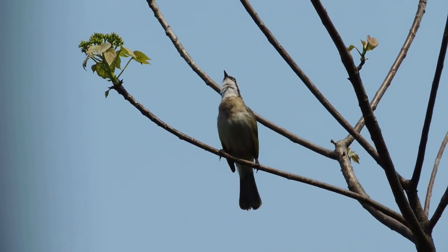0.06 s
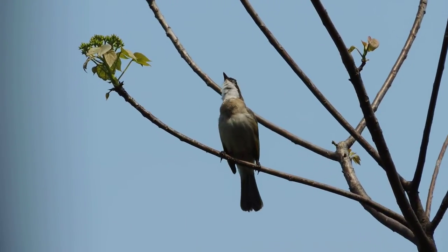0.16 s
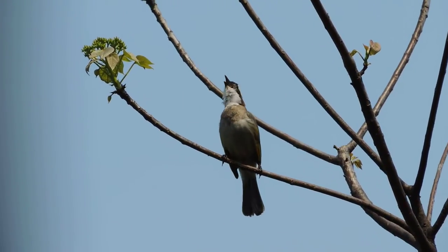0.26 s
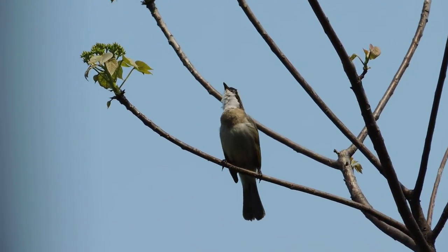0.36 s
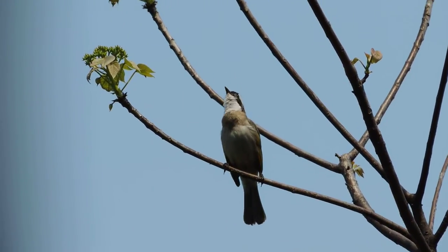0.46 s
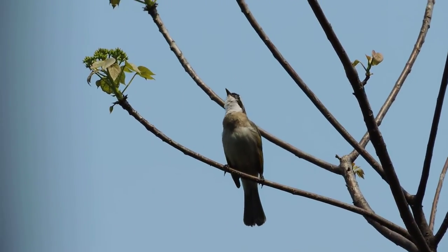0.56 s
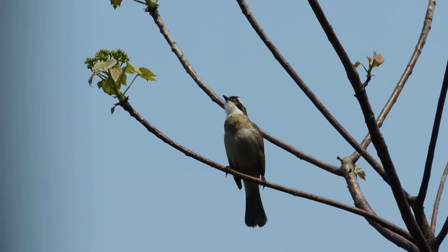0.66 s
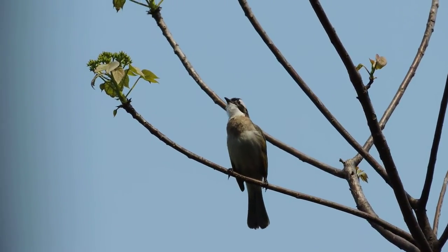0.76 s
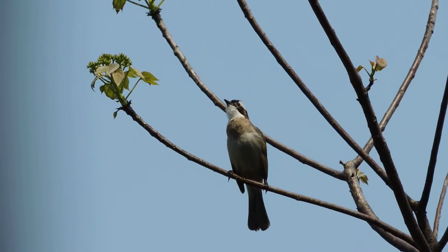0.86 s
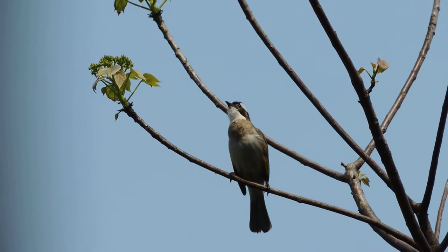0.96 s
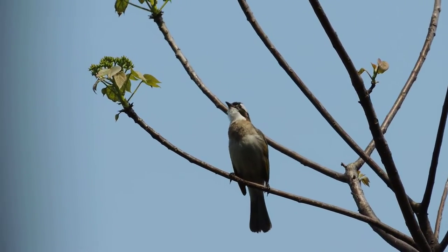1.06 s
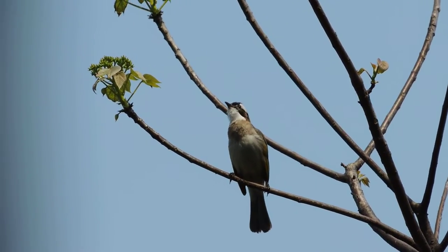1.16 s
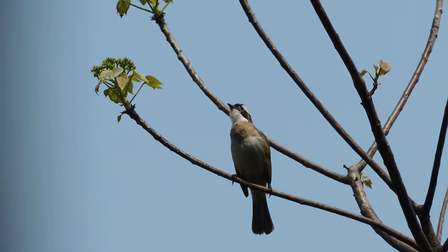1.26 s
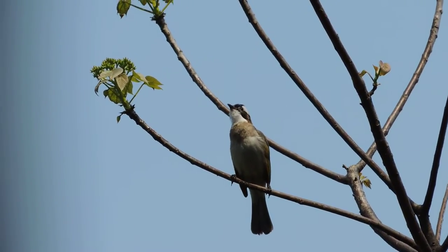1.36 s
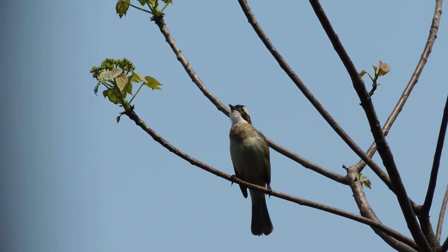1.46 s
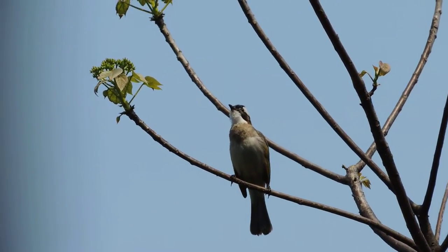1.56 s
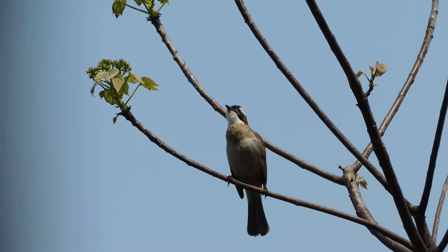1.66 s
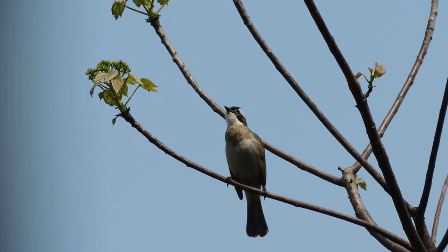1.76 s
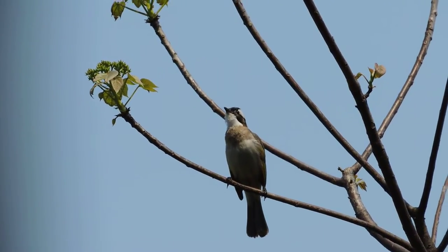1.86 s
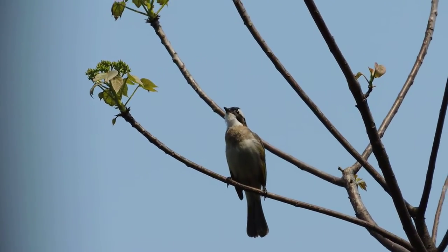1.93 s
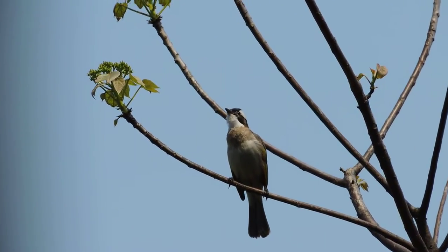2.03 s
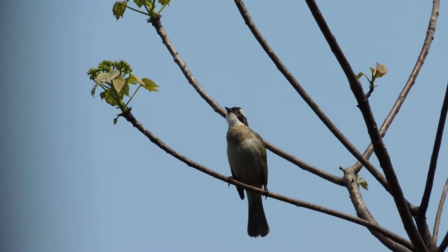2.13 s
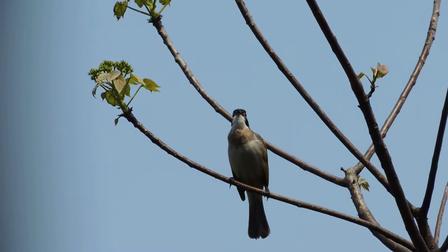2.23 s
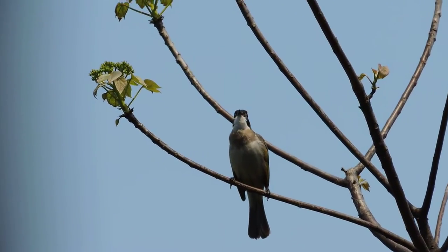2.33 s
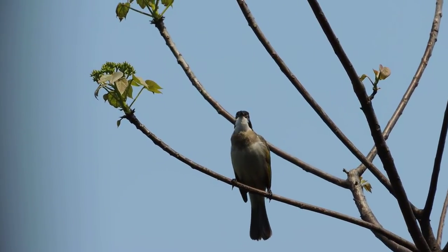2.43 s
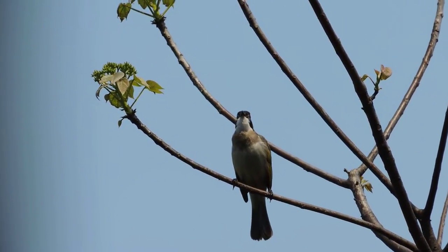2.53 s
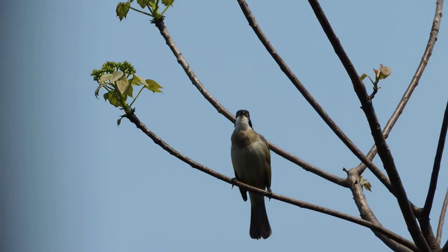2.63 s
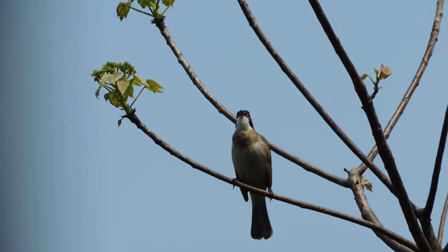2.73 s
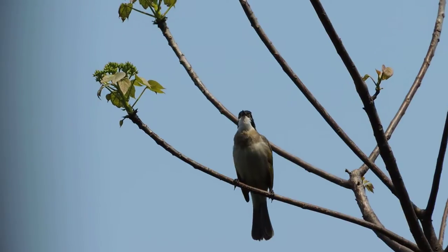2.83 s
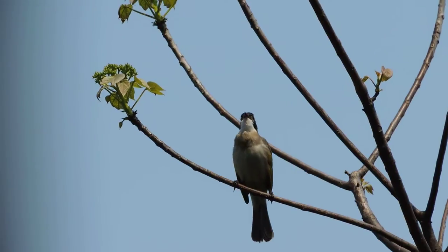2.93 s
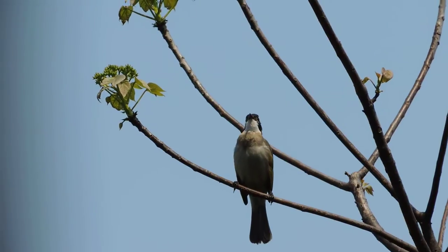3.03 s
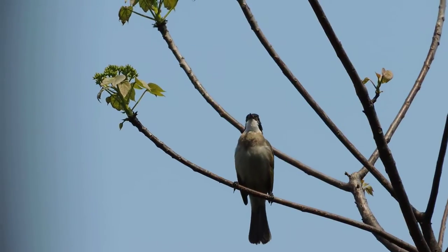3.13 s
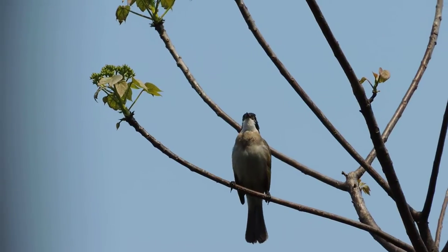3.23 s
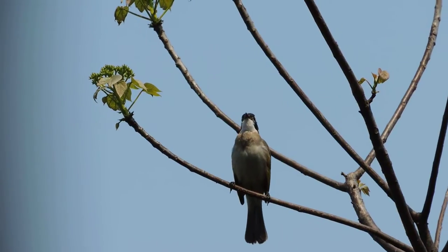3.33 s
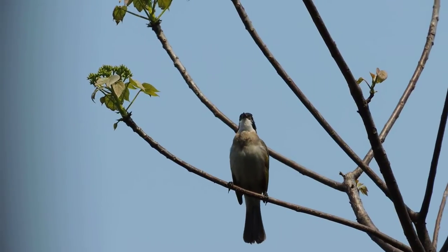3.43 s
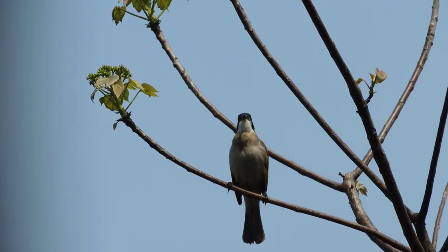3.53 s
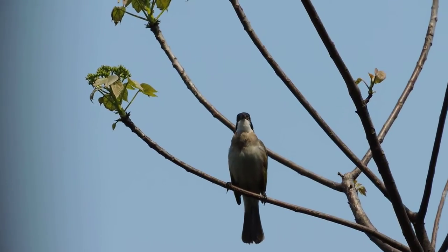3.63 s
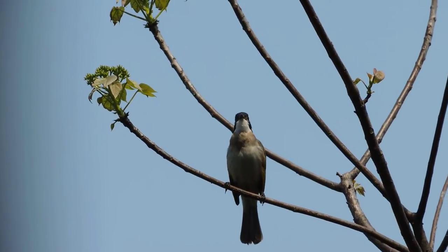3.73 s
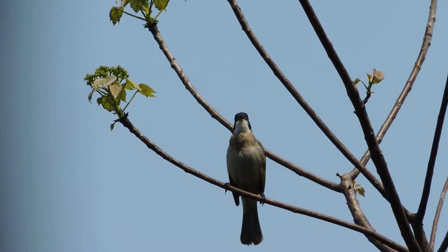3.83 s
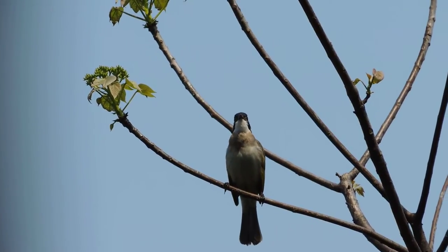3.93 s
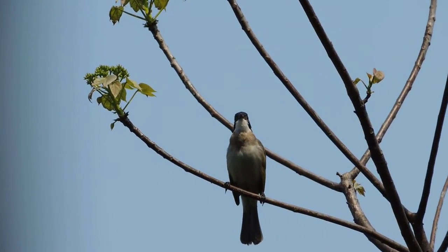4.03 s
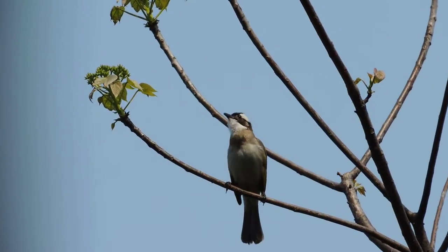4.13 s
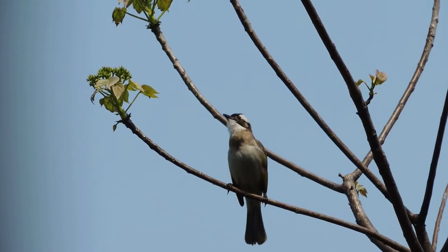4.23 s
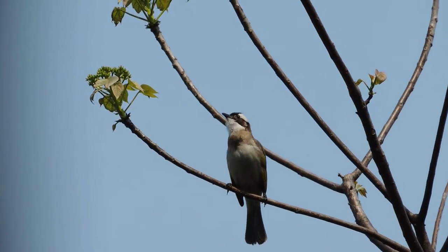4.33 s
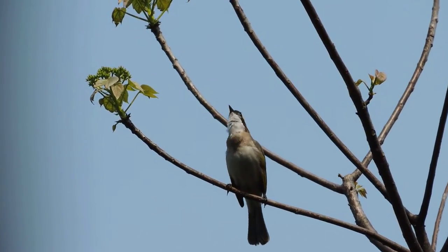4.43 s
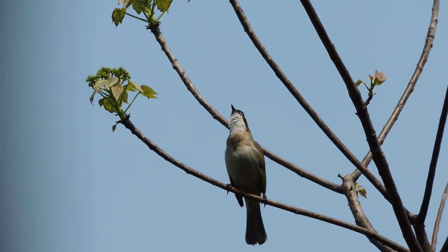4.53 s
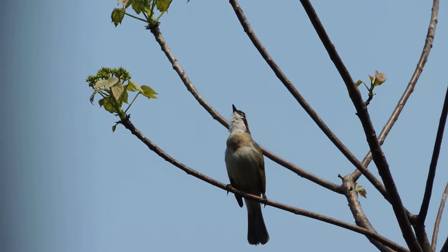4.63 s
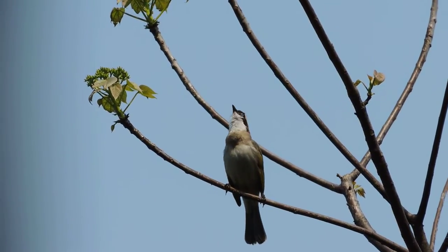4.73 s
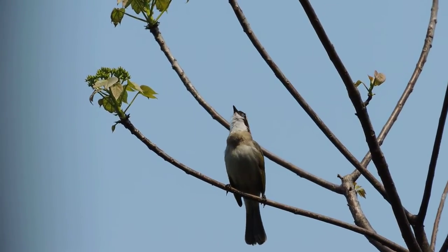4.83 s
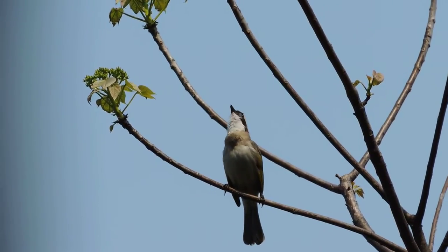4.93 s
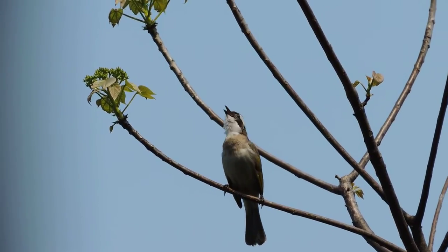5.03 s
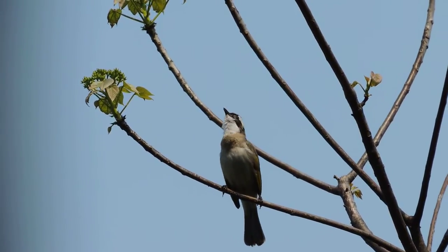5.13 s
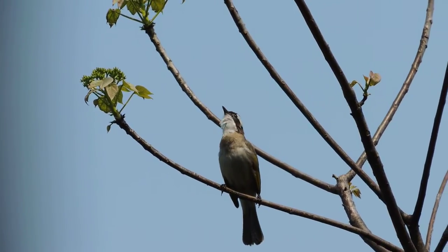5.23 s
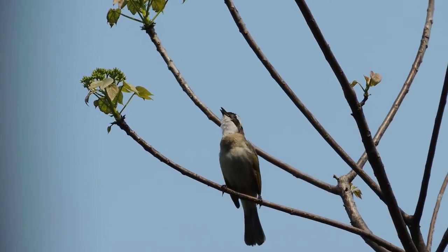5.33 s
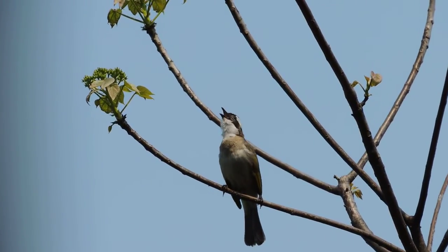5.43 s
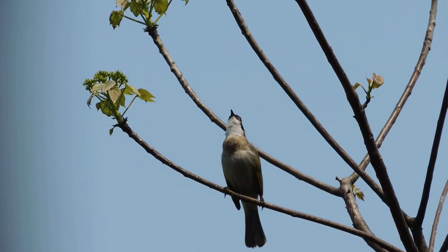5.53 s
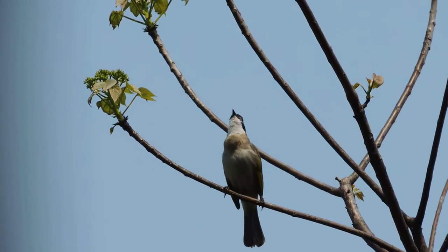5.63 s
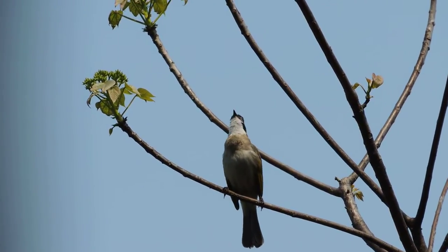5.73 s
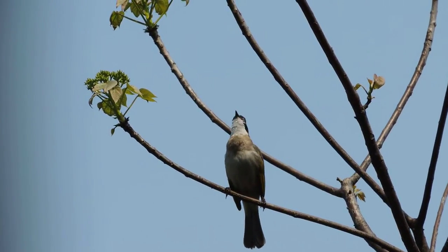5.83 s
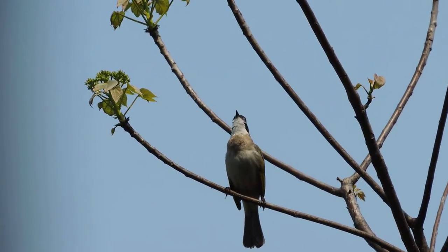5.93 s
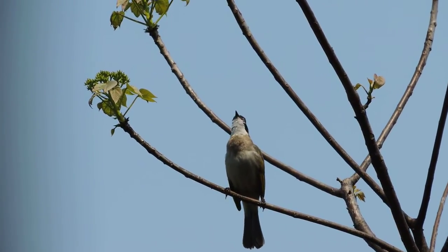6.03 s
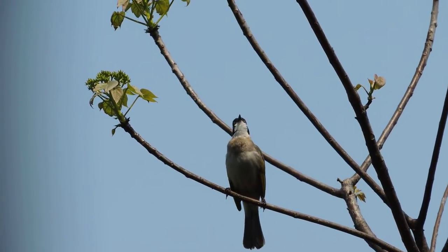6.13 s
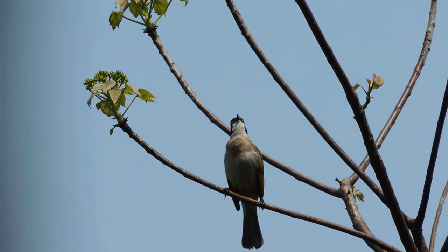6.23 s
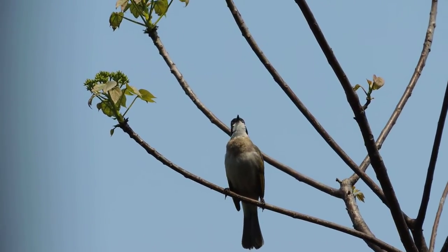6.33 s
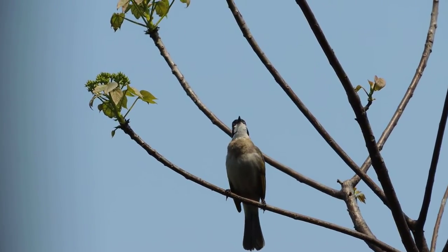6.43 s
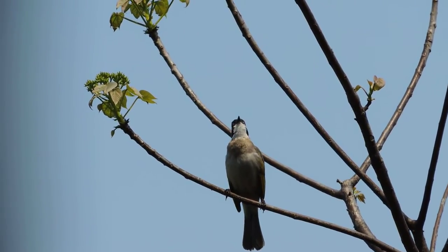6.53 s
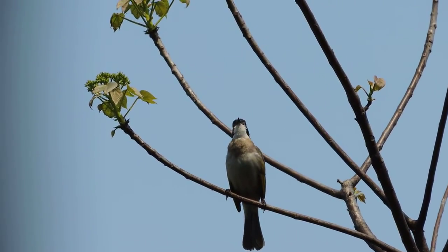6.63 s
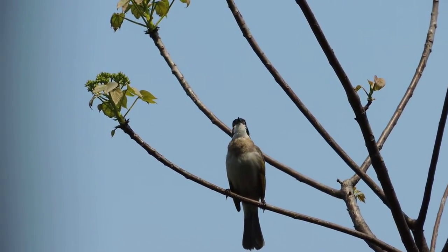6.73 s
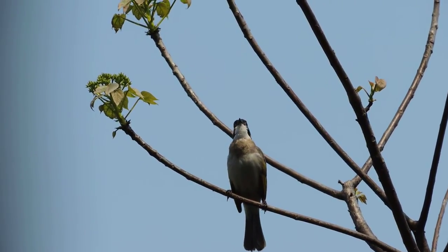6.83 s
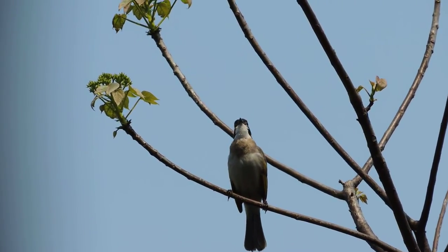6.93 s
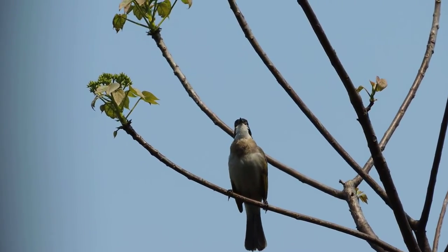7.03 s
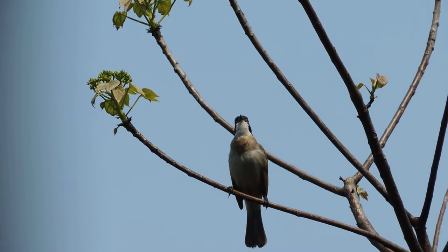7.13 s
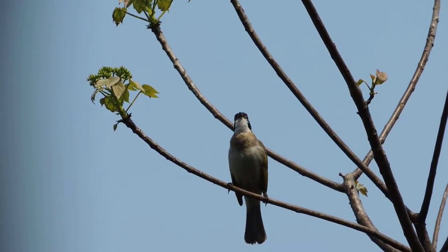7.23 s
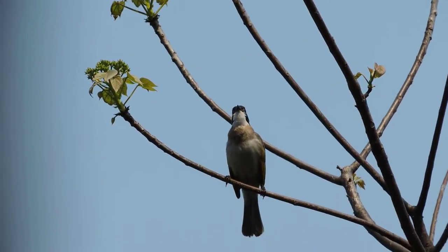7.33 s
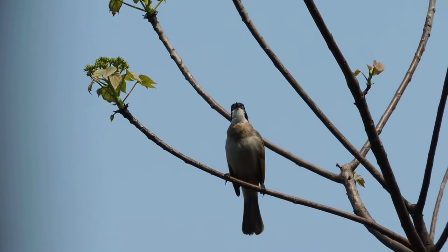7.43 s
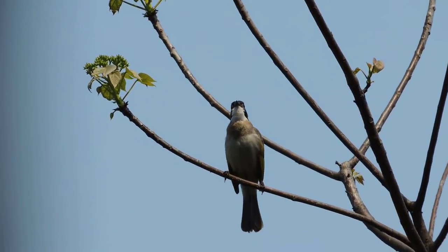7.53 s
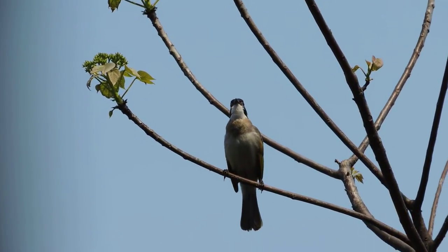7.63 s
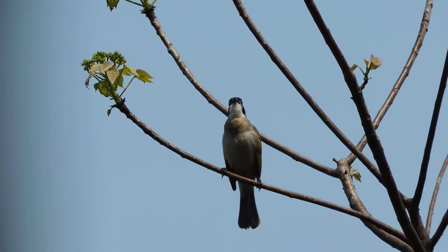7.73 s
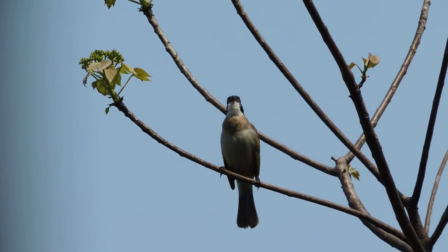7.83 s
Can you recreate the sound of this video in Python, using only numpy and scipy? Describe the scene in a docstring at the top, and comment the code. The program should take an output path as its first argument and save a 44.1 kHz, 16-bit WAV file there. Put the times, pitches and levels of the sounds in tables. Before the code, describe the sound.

A bulbul on a bare branch, close and clear, finishes one phrase: a loud rippling chirp, a soft low lead-in, another chirp. Several seconds of quiet follow, with low machine hum, distant traffic rumble, faint hiss and tiny far pips. It then sings a second phrase of quick notes and two chirps, echoing lightly off walls and trees, before the background returns.

```python
"""Bulbul on a branch, town behind

A bulbul close to the microphones sings two phrases, the first already under way: gliding partials from its
syrinx make soft low notes that lead into loud chirps flipping between two pitches. Nearby walls and trees
answer as delays and scatter; a far building sends back a faint, dull echo. Behind, wavering tones make a machine's
hum and whines, shaped noise the rumble of a town and the microphones' hiss; faint far calls and a thud pass.
"""
import sys
import numpy as np
from scipy import signal
from scipy.fft import rfft, irfft, next_fast_len
from scipy.io import wavfile
from scipy.ndimage import map_coordinates

SR = 44100
rng = np.random.default_rng(int(sys.argv[2]) if len(sys.argv) > 2 else 0)


def to_wav(s):
    """Save 16-bit WAV."""
    ch = np.atleast_2d(s).T  # columns
    pcm = np.round(np.clip(ch, -1, 1) * 32767)  # PCM
    wavfile.write(sys.argv[1], SR, pcm.astype(np.int16))


N = 347067


def amp(db):
    """Decibels to gain."""
    return 10 ** (np.asarray(db) / 20)


def unit(x):
    """Scale to rms 1."""
    return x / np.sqrt(np.mean(x ** 2) + 1e-20)


def along(points, hz):
    """Read a table of (f/Hz, value) points at hz, on a log axis."""
    f, v = np.transpose(points)
    return np.interp(np.log(hz + 1), np.log(f + 1), v)


def wobble(rate, size=N):
    """A smooth random curve with rate knots a second."""
    knots = rng.standard_normal(int(size * rate / SR) + 4)
    return map_coordinates(knots, [np.arange(size) * rate / SR])


def filtered(x, response):
    """Shape the spectrum of x by a response of frequency."""
    m = next_fast_len(N + SR // 2)
    spectrum = rfft(x, m) * response(np.fft.rfftfreq(m, 1 / SR))
    return irfft(spectrum, m)[..., :N]


def panned(lean_db):
    """Left and right gains for a left-minus-right level difference."""
    return amp(np.array([[1], [-1]]) * lean_db / 2)


def delayed(x, seconds):
    """The extra travel time of a longer path, as a phase slope."""
    return filtered(x, lambda hz: np.exp(-2j * np.pi * hz * seconds))


def add(track, s, sound):
    """Mix a sound into a track at s seconds; it may already be under way at time 0."""
    start = round(s * SR)
    sound = sound[max(-start, 0):]
    part = track[max(start, 0):][:len(sound)]
    part += sound[:len(part)]


def syllable(length, start_hz, end_hz, overtones_db, jitter, settle=2.14, edge=0.0019, arch_db=5,
             shimmer_db=1.56, rasp_db=-9, surge=0.4):
    """One glide of the syrinx: quick at first, then settling on its end pitch."""
    # what throat and beak let through of the overtones: f/Hz, level/dB
    throat = [(3000, -4), (4800, -22.5), (5700, -17), (7300, -27), (8500, -34), (9500, -1.5), (11400, -5),
              (12300, -18), (14000, -24)]
    t = np.arange(int((length + edge) * SR)) / SR
    u = t / t[-1]
    glide = (1 - np.exp(-settle * u)) / (1 - np.exp(-settle))
    steady_pitch = start_hz + (end_hz - start_hz) * glide
    pitch = steady_pitch * (1 + jitter * wobble(872, size=len(t)))
    phase = 2 * np.pi * np.cumsum(pitch) / SR

    # air pressure swells early in the syllable and sags towards its end
    gate = np.sin(np.clip(np.minimum(t, t[-1] - t) / edge, 0, 1) * np.pi / 2) ** 2
    arch = arch_db * (np.sin(np.pi * u ** 0.69) - 2 / np.pi)
    pressure = gate * amp(arch + shimmer_db * wobble(263, size=len(t)))

    # the chirps' fourth partial falls near the throat's high resonance; uneven closure frays the overtones
    k = np.arange(2, 8)[:, None]
    gains = amp(overtones_db + along(throat, k * pitch)) * (k * pitch < SR / 2)
    fray = amp(rasp_db) * wobble(4010, size=len(t))
    overtones = np.sum(gains * (np.sin(k * phase) + fray * np.cos(k * phase)), axis=0)
    # harder blowing is brighter
    return np.sqrt(2) * pressure * (np.sin(phase) + pressure ** surge * overtones)


def chirp(s, hz, db, stretch, bright_db):
    """A flick, then flips between a high and a low voice, at one pitch, strength, pace and brightness."""
    # syllables when sung at shape_hz: offset t/s, length t/s, start f/Hz, end f/Hz,
    # level/dB and overtones level/dB (both shifted for each chirp)
    shape = [ (0, .0052, 3330, 2900, 2.5, -20), (.0065, 0.011, 2780, 2860, -3, -10.5),
             (.0195, .0115, 2480, 2400, -5, -6), (.0335, 0.02, 2976, 2690, 0.5, -12),
             (0.062, 0.015, 2460, 2345, -3, -10.5), (.0765, .02, 2990, 2604, -1, -14.5), ]
    shape_hz = 2800
    scale = hz / shape_hz
    return [(s + stretch * offset, stretch * length, scale * start_hz, scale * end_hz,
             db + level_db, overtones_db + bright_db)
            for offset, length, start_hz, end_hz, level_db, overtones_db in shape]


def bulbul(chirp_jitter=0.019, murmur_jitter=0.024):
    """Opening notes, lead-ins and chirps; slack membranes hold the low notes less steadily."""
    # each chirp: t/s, pitch f/Hz, level/dB, time stretch (ratio), brightness of the overtones level/dB
    chirps = [(-.0085, 2804, -26, 0.97, 1), (0.4184, 2782, -24.5, 1.01, 0.5), (5.1257, 2806, -26.5, .99, 3),
              (5.5531, 2884, -24.5, 1.01, -1.5)]
    # soft lead-ins: t/s, low f/Hz, high f/Hz, length of the high note t/s, level/dB
    lead_ins = [(0.249, 1483, 1936, 0.03, -44), (5.386, 1457, 2030, 0.057, -46)]
    # single notes that open the second phrase:
    # t/s, length t/s, start f/Hz, end f/Hz, level/dB, overtones level/dB
    opening = [ (4.581, 0.0093, 2650, 2220, -34, -19), (4.686, 0.034, 1640, 1550, -44, -15),
               (4.722, 0.0175, 3080, 2633, -24, -15), (4.736, .008, 2590, 2880, -35, -6),
               (4.743, .011, 2470, 2280, -30.5, -6.5), (4.756, 0.0266, 2510, 2367, -28.5, -10.5), ]
    figures = [opening] + [lead_in(*row) for row in lead_ins] + [chirp(*row) for row in chirps]
    song = np.zeros(N)
    for figure in figures:
        for s, length, start_hz, end_hz, db, overtones_db in figure:
            jitter = np.interp(end_hz, [1500, 2400], [murmur_jitter, chirp_jitter])
            add(song, s, amp(db) * syllable(length, start_hz, end_hz, overtones_db, jitter))
    return song


def perch(song):
    """The direct path from the branch: it reaches the right microphone first, its treble stronger there."""
    # f/Hz, left minus right level/dB
    perch_lean = [(2400, 2.5), (3100, -3.5), (10000, -6)]
    pair = np.array([delayed(song, .000015), song])
    return amp(-3.0) * filtered(pair, lambda hz: panned(along(perch_lean, hz)))


def town():
    """Distant traffic: alike in both ears in the bass, diffuse higher up; the low part swells on its own."""
    # the rumble's relative spectrum: f/Hz, level/dB per Hz
    rumble = [(22, -6.5), (40, -10), (56, 0), (72, -6), (135, -1.5), (170, -6), (245, -1), (330, -10),
              (600, -17.5), (900, -12.5), (1120, -20), (1700, -23), (3000, -27), (6000, -40)]
    # f/Hz, left-right likeness (0 to 1)
    likeness = [(60, 0.99), (130, 0.97), (290, 0.98), (630, 0.74), (1390, 0.58), (3000, 0)]
    # f/Hz, left minus right level/dB
    town_lean = [(60, 1.5), (200, 0), (380, 4.5), (690, -1), (1270, 1), (2400, 1.5)]
    # swell of the low part, used about its mean: t/s, level/dB
    traffic = [(0, -43.5), (1.25, -43.5), (1.5, -46.5), (4.5, -45.5), (6.8, -46.5), (7.87, -45)]

    def mid_and_side(hz):
        colour = amp(along(rumble, hz)) * hz ** 2 / (hz ** 2 + 15 ** 2)
        turn = np.arccos(np.clip(along(likeness, hz), -1, 1)) / 2
        return colour * [np.cos(turn), np.sin(turn)]

    mid, side = filtered(rng.standard_normal((2, N)), mid_and_side)
    pair = np.array([mid + side, mid - side])
    air = unit(filtered(pair, lambda hz: panned(along(town_lean, hz))))
    low = filtered(air, lambda hz: 1 / (1 + (hz / 450) ** 4))
    s, db = np.transpose(traffic)
    swell = amp(np.interp(np.arange(N) / SR, s, db - np.mean(db)))
    upper = (air - low) * amp(0.75 * wobble(3.035))
    return amp(-41.5) * (low * swell + upper)


def machine(flutter_db=2.5):
    """A motor hum with thin, wavering whines, reaching the right microphone first."""
    # tones: f/Hz, level/dB, wander f/Hz, left minus right level/dB
    tones = [(117.7, -42.5, 0.065, 2), (870, -65.5, 6.5, -1), (1852, -65, 9.83, -6), (1886, -63.5, 22.1, 2)]
    out = np.zeros((2, N))
    for hz, db, wander_hz, lean_db in tones:
        phase = 2 * np.pi * np.cumsum(hz + wander_hz * wobble(45)) / SR
        # moving air disturbs short waves most
        fading = amp(flutter_db * np.sqrt(hz / 2000) * (wobble(6) + wobble(35)))
        out += amp(db) * panned(lean_db) * unit(fading * np.sin(phase))
    return np.array([delayed(out[0], .00009), out[1]])


def hiss():
    """The microphones' own steady noise, independent left and right."""
    # relative spectrum: f/Hz, level/dB
    hiss_colour = [(500, -11), (2500, 0.5), (5000, 0.5), (8000, -1.5), (14000, -4.5)]
    noise = rng.standard_normal((2, N))
    return amp(-54.0) * unit(filtered(noise, lambda hz: amp(along(hiss_colour, hz))))


def thrown_back(song):
    """Leaves and walls colour what they throw back, leaving it weaker above the low notes."""
    # f/Hz, level/dB
    reflected = [(1600, 7.5), (2350, -0.5), (2750, 0), (3400, -2.5), (10000, 0.5)]
    return filtered(song, lambda hz: amp(along(reflected, hz)))


def yard(x, build=0.0022):
    """Scatter from trees and walls builds up over build seconds, then dies soonest in the high treble."""
    # f/Hz, time to fall 60 dB t/s
    decay = [(1500, 0.41), (2800, 0.44), (6000, 0.46), (11000, 0.15)]
    hz, t, z = signal.stft(rng.standard_normal((2, SR)), SR, nperseg=256)
    fade = amp(-60 * t / along(decay, hz)[:, None]) * (1 - np.exp(-t / build))
    tail = signal.istft(z * fade, SR, nperseg=256)[1]
    return signal.fftconvolve(x[None], tail / np.linalg.norm(tail[0]), axes=1)[:, :N]


def close_walls(thrown):
    """Single reflections from walls close by, each a later and weaker copy."""
    # delay t/s, left level/dB, right level/dB
    walls = [(0.01, -17, -14.5), (0.0188, -29, -13.5), (.031, -31, -31)]
    return sum(amp([[left_db], [right_db]]) * delayed(thrown, delay) for delay, left_db, right_db in walls)


def lead_in(s, low_hz, high_hz, high_length, db, grace_s=.019, grace_rise=.14,
            low_overtones_db=-21, high_overtones_db=-11):
    """Three joined syllables: a rising grace note, a level low note, and a scoop up to the high note."""
    step_s, step_up_db = .052, 2  # when the high note comes, and how much louder
    scoop = 0.0445  # share of its pitch that the high note rises by
    return [
        (s, grace_s, low_hz, low_hz * (1 + grace_rise), db - 2.5, low_overtones_db),
        (s + grace_s, step_s - grace_s, low_hz, low_hz, db, low_overtones_db),
        (s + step_s, high_length, high_hz * (1 - scoop), high_hz, db + step_up_db, high_overtones_db),
    ]


def far_echo(x, delay=.39, t60=1.6, dull_hz=3000):
    """A smeared, dull answer from a distant building: decaying noise, delayed and stripped of treble."""
    t = np.arange(SR) / SR
    tail = rng.standard_normal((2, SR)) * amp(-60 * t / t60)
    echo = signal.fftconvolve(x[None], tail / np.linalg.norm(tail[0]), axes=1)[:, :N]
    return filtered(delayed(echo, delay), lambda hz: 1 / (1 + (hz / dull_hz) ** 8))


def far_calls():
    """Pips and another bird's chirp from far off, nearly pure glides half lost in the scatter."""
    # faint pips, all alike: t/s, level/dB
    pips = [(1.216, -58.5), (1.717, -59), (2.47, -59), (3.755, -59)]
    # another bird: t/s, length t/s, start f/Hz, end f/Hz, level/dB
    far_chirps = [(7.01, 0.03, 4750, 3650, -62.5)]
    pip_s, pip_start_hz, pip_end_hz = 0.031, 1390, 1327
    notes = [(s, pip_s, pip_start_hz, pip_end_hz, db) for s, db in pips] + list(far_chirps)
    calls = np.zeros(N)
    for s, length, start_hz, end_hz, db in notes:
        add(calls, s, amp(db) * syllable(length, start_hz, end_hz, overtones_db=-40, jitter=0.022))
    return calls + yard(calls)


def thuds(width=0.03):
    """A soft low boom far off: a sine that swells and fades within a few cycles."""
    # t/s of the peak, f/Hz, level/dB
    booms = [(2.678, 108, -39.5)]
    t = np.arange(N) / SR
    out = np.zeros(N)
    for s, hz, db in booms:
        envelope = np.exp(-((t - s) / width) ** 2)
        out += amp(db) * np.sqrt(2) * envelope * np.sin(2 * np.pi * hz * (t - s))
    return out


def scene():
    """The bird on its branch with its echoes, over the background."""
    song = bulbul()
    thrown = thrown_back(song)
    scatter = amp(-10.5) * panned(lean_db=3) * yard(thrown)
    bird = perch(song) + scatter + close_walls(thrown) + amp(-21.5) * far_echo(thrown)
    background = town() + machine() + hiss() + far_calls() + thuds()
    return bird + background


def record(dry):
    """The recorder keeps nothing above its band limit."""
    top_hz = 14250
    return filtered(dry, lambda hz: hz < top_hz)


dry = scene()
out = record(dry)
to_wav(out)
```